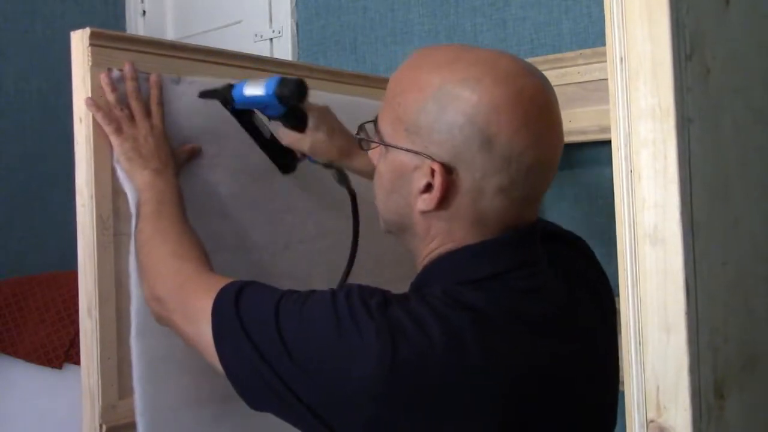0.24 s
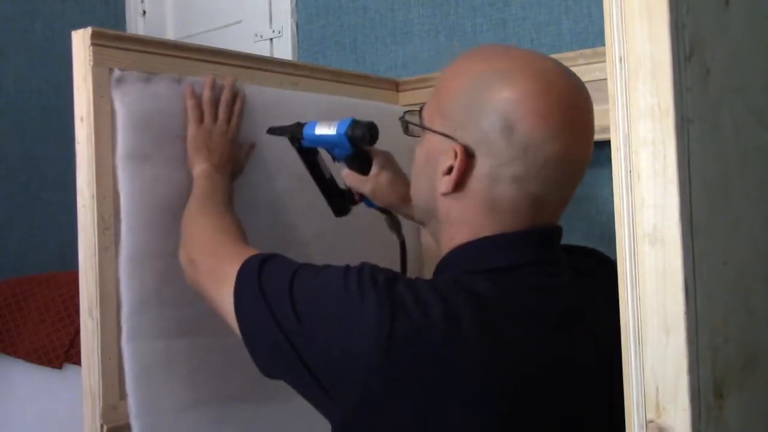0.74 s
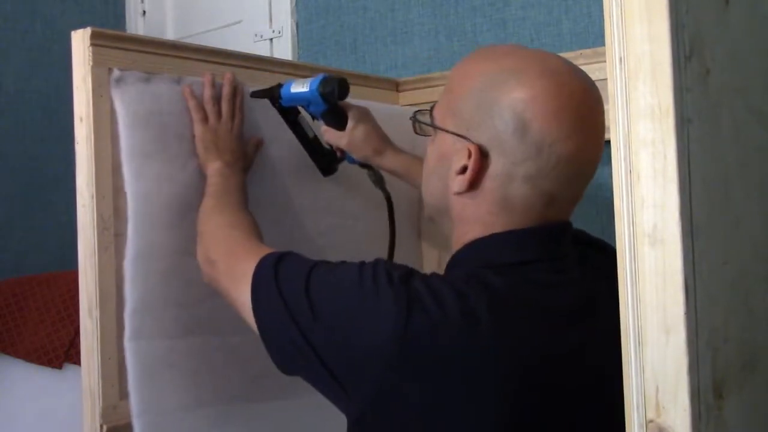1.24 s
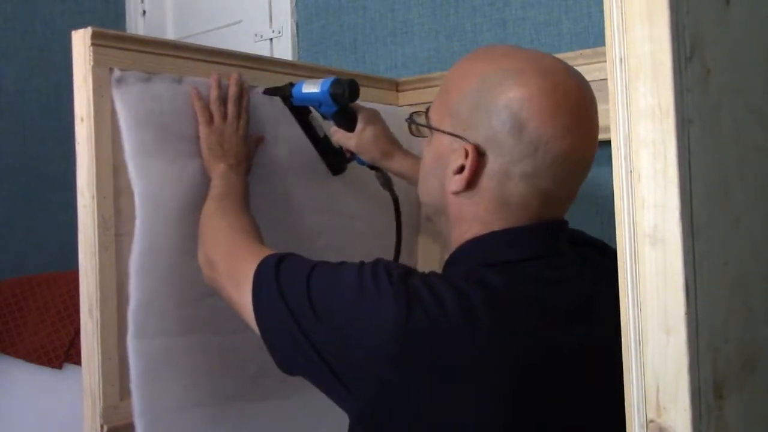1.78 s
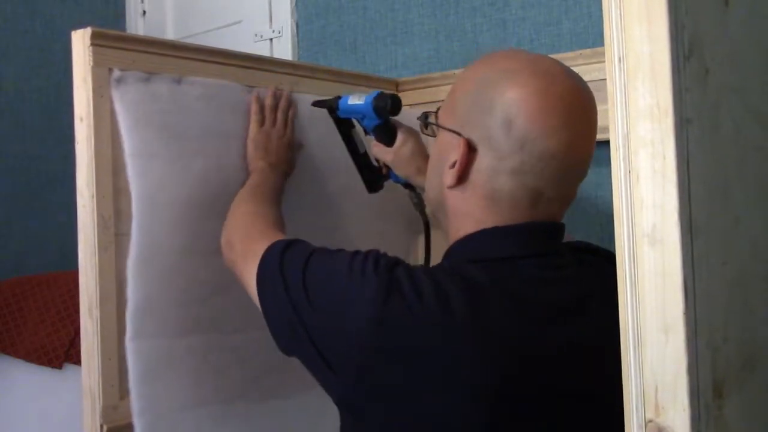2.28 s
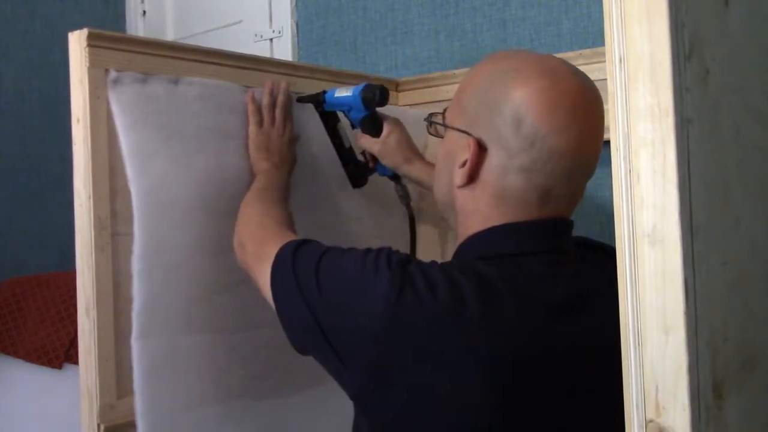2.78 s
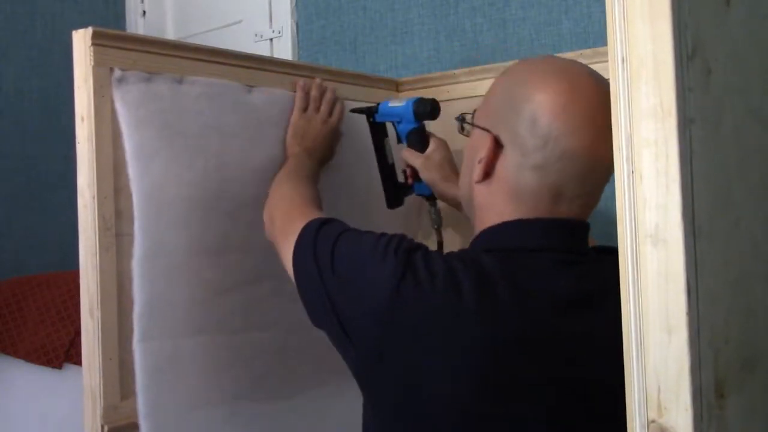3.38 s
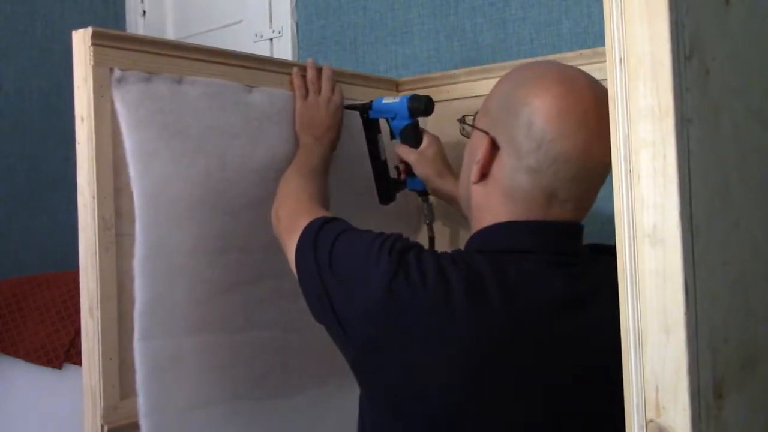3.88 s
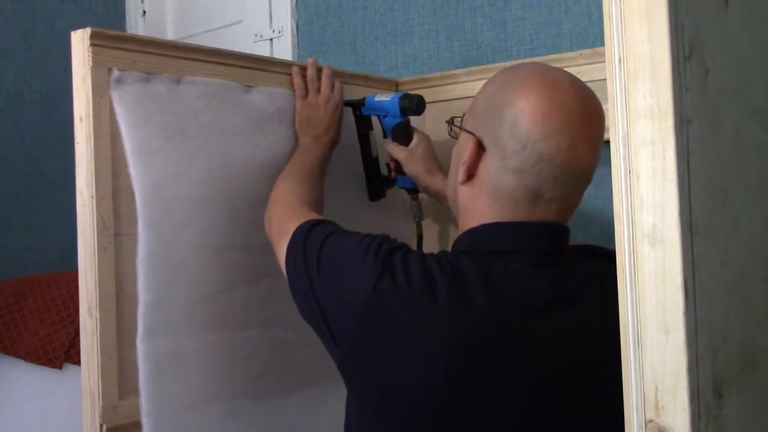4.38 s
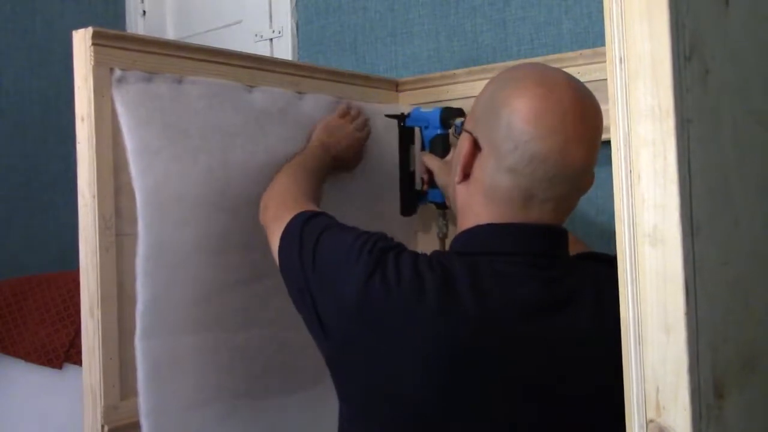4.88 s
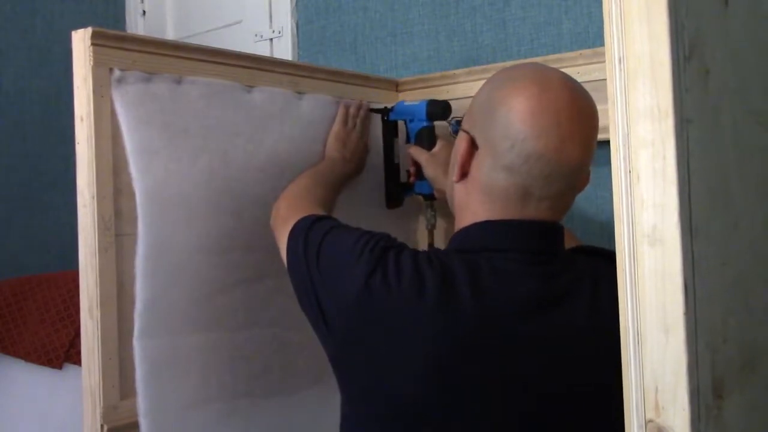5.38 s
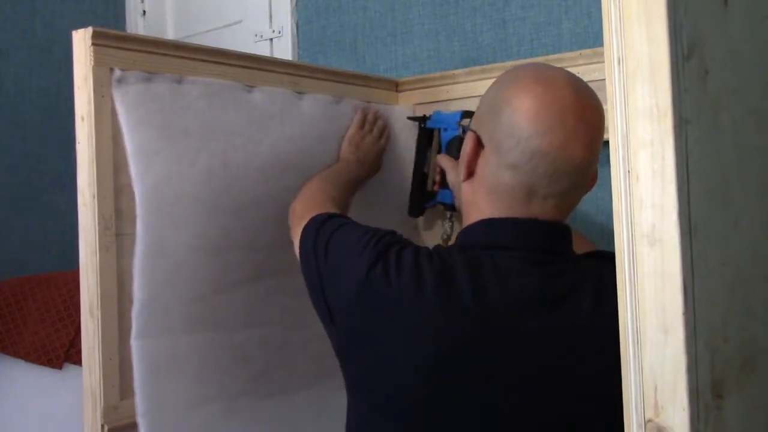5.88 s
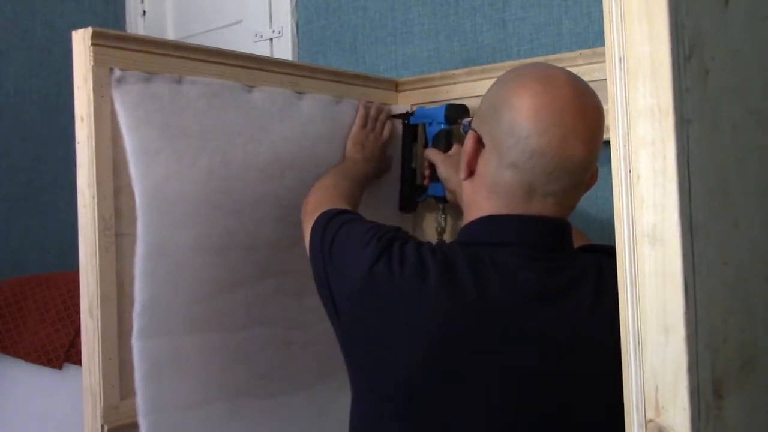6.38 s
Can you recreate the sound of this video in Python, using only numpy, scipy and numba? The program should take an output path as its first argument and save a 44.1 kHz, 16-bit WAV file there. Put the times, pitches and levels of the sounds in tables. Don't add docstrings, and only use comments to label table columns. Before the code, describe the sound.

In a small room, close to the microphone, an air stapler fires five loud shots into padding on wood. Each is a hard woody crack, followed a tenth of a second later by a spitting puff of air and a metallic clack. Between them come a palm rub, light wooden knocks, and a thin hose hiss over low room hum.

```python
import sys
import numpy as np
from scipy import signal
from scipy.io import wavfile
from scipy.ndimage import uniform_filter1d, map_coordinates
from numba import njit

SR = 44100
rng = np.random.default_rng(int(sys.argv[2]) if len(sys.argv) > 2 else 0)


def voltage_ratio(decibels):
    exponent = np.asarray(decibels, float) / 20
    return 10 ** exponent


def put_to_file(sound):
    columns = np.atleast_2d(sound).T
    safe = np.clip(columns, -1, 1)
    whole_steps = np.round(safe * 32767)
    wavfile.write(sys.argv[1], SR, whole_steps.astype(np.int16))


N = 293265
LEAD_IN = 4096
LATCH_S = .0325

# f/Hz, level/dB
HUM_TONE = [(15, -40), (25, -27), (43, -15.5), (76, -25.5), (113, -4), (178, -0.5), (204, -2), (261, -6),
            (328, 0), (367, -7), (401, -3), (429, -11), (492, -8), (1490, -17.5), (5500, -26), (7150, -56),
            (12100, -120)]
# f/Hz, side under mid/dB
HUM_WIDTH = [(60, -13.5), (110, -15), (200, -19), (380, -11.5), (700, -11), (1290, -10.5), (2380, -8.5),
             (4400, -16), (8120, -14.5), (15000, -28)]
# f/Hz, t60/s
ROOM_DECAY = [(120, 0.34), (330, 0.37), (870, 0.33), (2300, 0.25), (6000, 0.24), (10000, .2), (15000, 0.23)]
# f/Hz, side under mid/dB
ROOM_WIDTH = [(60, -30), (110, -29), (200, -41.5), (380, -35.5), (700, -32.5), (1290, -28), (2380, -26.5),
              (4400, -22.5), (8120, -15.5), (15000, -19)]
# f/Hz, level/dB
LEAK_TONE = [(2350, -27.5), (4000, -12.5), (5300, -11.5), (5880, -3.5), (6480, -0.5), (7970, 0.5),
             (10600, -3), (12500, -10.5), (15100, -9.5), (15800, -28.5)]
# start t/s, end t/s, bounce path at start/ms, at end/ms, leak level/dB
APPROACHES = [
    (1.1, 1.5, .81, .72, -63.5),
    (1.9, 2.7, .655, 0.55, -64.5),
    (3.1, 4.4, .93, .71, -62.5),
    (4.8, 5.5, .855, .69, -64),
    (5.9, 6.65, .75, .59, -64),
]
# start t/s, length/s, level/dB, trailing level/dB
STROKES = [
    (0.278, .5, -49, -62.5),
    (5.98, 0.25, -59, -70),
]
# f/Hz, level/dB
RUB_TONE = [(880, -39), (1500, -21), (1960, -5), (2140, -4), (2530, -1.5), (4050, -8), (5240, -2),
            (9830, 1), (13100, -12), (14900, -13.5), (15800, -16)]
# t/s, knock level/dB, scuff level/dB, panel thud level/dB
TOUCHES = [(0.352, -26, -90, -61), (0.644, -13, -43.5, -62), (0.699, -48, -62.5, -62),
           (1.468, -37, -43.5, -51), (1.497, -29.5, -52.5, -67), (2.294, -49, -54.5, -51),
           (2.37, -41, -55.5, -45), (2.515, -54, -53.5, -50), (2.56, -55, -58.5, -50),
           (2.617, -58.5, -54, -55), (2.726, -21.5, -38.5, -27.5), (2.744, -32, -37.5, -31),
           (3.157, -21, -41.5, -42), (3.254, -25, -41.5, -46), (3.299, -36.5, -55, -60),
           (3.452, -52, -55.5, -47), (3.513, -50, -54, -50), (3.748, -54, -56, -54),
           (3.937, -54, -60, -50.5), (4.118, -48, -59, -53.5), (4.267, -57, -63, -56.5),
           (4.324, -44, -54, -40), (4.369, -44, -54.5, -48), (5.437, -22, -43, -51),
           (5.46, -25.5, -54, -48), (6.611, -39.5, -46, -45)]
# f/Hz, level/dB
WOOD = [(250, -10.5), (330, -3), (425, -1), (560, -3), (720, -4), (900, -8), (1150, -16)]
# f/Hz, level/dB
SCUFF_TONE = [(60, -24), (110, -1.5), (400, 4), (1200, 1), (2500, -6), (3600, -15.5), (6000, -24),
              (16000, -44.5)]
# piston blow t/s, trigger let go after/s, piston return after/s
SHOTS = [
    (-.018, .102, .1165),
    (1.5793, .102, .1165),
    (2.783, .093, .1095),
    (4.427, .101, .1163),
    (5.5175, .090, .109),
]
# blow level/dB, exhaust level/dB, batten tuning [factor]
FORCE = [(30.7, -2, 1.3), (30.5, -1.5, 1.04), (28.9, -2, 0.93), (31, -1.5, .95), (29.9, -2.5, .99)]
# f/Hz, level/dB
JET_TONE = [(50, -15), (200, 0), (880, 1), (1500, -3), (2730, -1.5), (3400, -2.5), (4650, -2.5),
            (5030, -6.5), (5500, 0), (7100, 1), (9360, -3), (15800, -21)]
# f/Hz, level/dB, t60/s
THUMP = [(375, 0, .014), (700, -12, .012), (2000, -3, .014)]
# f/Hz, level/dB, t60/s
CRACK = [(4000, 3, .006), (2300, -2, .009), (6500, -5, .004), (1100, -9, .014)]
# f/Hz, level/dB
FRAME_TONE = [(18, -72.5), (30, -39.5), (70, -33), (115, -19), (309, -9), (628, -4.5), (754, -9.5),
              (859, -8), (1120, -7.5), (1240, -7.5), (2800, -6), (4480, -16.5), (7000, -21.5), (13800, -44),
              (15800, -57.5)]
# f/Hz, level/dB, t60/s
BATTENS = [(316.4, 0, 0.23), (443, -0.5, 0.19), (598.6, -9, 0.23), (882, -7.5, 0.18), (1157, -3, 0.2),
           (1693, -4.5, 0.28), (2640, -9, .22)]
# f/Hz, level/dB, t60/s
RETURN = [(499, 5.5, 0.048), (915, -2, 0.01), (1660, -30, .25)]
# f/Hz, level/dB, t60/s
MAGAZINE = [(1154, 2.5, 0.15), (1737, -4, 0.22), (851, -4, 0.2), (601, -1.5, 0.13), (1049, 3.5, 0.2),
            (1204, -2.5, 0.23)]


def evened(x):
    return x / np.sqrt(np.mean(x ** 2) + 1e-20)


def read(points, hz):
    f, value = np.transpose(points)
    return np.interp(np.log(hz + 1), np.log(f + 1), value)


def colour(x, points):
    db = read(points, abs(np.fft.fftfreq(4096, 1 / SR)))
    log_gain = np.log(voltage_ratio(np.maximum(db, -100)))
    taps = np.fft.ifft(np.exp(np.conj(signal.hilbert(log_gain)))).real[:2048]
    return signal.oaconvolve(x, taps)[:len(x)]


def noise(length, points):
    return evened(colour(rng.standard_normal(length), points))


def add(mix, s, sound):
    part = mix[..., round(s * SR):][..., :sound.shape[-1]]
    part += sound[..., :part.shape[-1]]


def ring(modes, detune=1., rise_s=.0002):
    t = np.arange(SR // 4) / SR
    sines = sum(voltage_ratio(db - 60 * t / t60) * np.sin(2 * np.pi * hz * detune * t) for hz, db, t60 in modes)
    return sines * (1 - np.exp(-t / rise_s))


def room(x):
    taps = rng.standard_normal((2, SR // 2))
    hz, t, z = signal.stft(taps, SR, nperseg=256)
    z = z * voltage_ratio(-60 * t / read(ROOM_DECAY, hz)[:, None])
    z[1] *= voltage_ratio(read(ROOM_WIDTH, hz) + 4)[:, None]
    clumps = uniform_filter1d(rng.standard_normal(z.shape), size=3, axis=2)
    clumps = evened(uniform_filter1d(clumps, size=5, axis=1))
    z *= voltage_ratio(2.7 * clumps)
    tail = signal.istft(z, SR, nperseg=256)[1]
    tail = tail * np.clip(np.arange(tail.shape[1]) / SR / .004 - 1, 0, 1)
    mid, side = signal.fftconvolve(x[None], tail / np.linalg.norm(tail[0]), axes=1)
    return np.array([mid + side, mid - side])


def hum():
    frames, hz = N // 256 + 5, np.fft.rfftfreq(1024, 1 / SR)
    a, b, c, d, patches = rng.standard_normal((frames, 513, 5)).T
    patches = uniform_filter1d(patches, size=10, axis=0)
    patches = evened(uniform_filter1d(patches, size=8, axis=1))
    z = np.array([a + 1j * b, (c + 1j * d) * voltage_ratio(read(HUM_WIDTH, hz))[:, None]])
    z = z * voltage_ratio(read(HUM_TONE, hz)[:, None] + 1.5 * patches)
    mid, side = signal.istft(z, nperseg=1024, noverlap=768)[1][:, :N]
    return voltage_ratio(-52.5) * evened(np.array([mid + side, mid - side]))


def leak():
    bounce_far, bounce_near, facing_s = .3, .58, .4
    t = np.arange(N) / SR
    start, end, far_ms, near_ms, db = np.transpose(APPROACHES)
    moments = np.ravel([start, end], "F")
    path_ms = np.interp(t, moments, np.ravel([far_ms, near_ms], "F"))
    level_db = np.interp(t, moments, np.repeat(db, 2)) - 0.5
    facing = sum(np.clip(np.minimum(t - a, b + facing_s / 2 - t) / facing_s, 0, 1)
                 for a, b in zip(start, end))
    hiss = noise(N, LEAK_TONE)
    thrown = signal.filtfilt(*signal.butter(1, [6000, 11500], "band", fs=SR), hiss)
    bounce = map_coordinates(thrown, [np.arange(N) - path_ms * SR / 1000], order=3)
    strength = bounce_far + (bounce_near - bounce_far) * facing
    return voltage_ratio(level_db) * (hiss + .75 * strength * bounce)


def stroke(t, start, length, db, trail_db):
    rise_s, sag_db, stop_s, trail_s = 0.056, -7, .035, .15
    u = t - start
    slide = np.clip(np.minimum(u / rise_s + 1, (length - u) / stop_s + 1), 0, 1)
    slide = slide * voltage_ratio(db + sag_db * np.clip(u / length, 0, 1) ** 2)
    return slide + voltage_ratio(trail_db) * (u > length) * (u < length + trail_s)


def hand():
    t = np.arange(N) / SR
    level = uniform_filter1d(sum(stroke(t, *row) for row in STROKES), size=400)
    snags = voltage_ratio(1.5 * evened(uniform_filter1d(rng.standard_normal(N), size=900)))
    return snags * level * noise(N, RUB_TONE)


def touch(knock_db, scuff_db, thud_db, rise_s=.0015, t60=.095):
    t = np.arange(SR // 4) / SR
    grain = np.arange(600)
    contact = rng.standard_normal(600) * np.exp(-grain / 110.0) / 9 + (grain == 0)
    contact = contact / np.linalg.norm(contact) * 1.2
    spot = rng.uniform(-0.81, 1, (len(WOOD), 2))
    modes = [(hz * (1 + .06 * a), db + 3 * b, t60 * 250 / hz) for (hz, db), (a, b) in zip(WOOD, spot)]
    wood = signal.oaconvolve(ring(modes, rise_s=0.0017), contact)[:len(t)]
    thud = ring([(130, thud_db, 0.14), (195, thud_db - 4, 0.18)], rise_s=max(rise_s, .004))
    scuff = noise(len(t), SCUFF_TONE) * np.minimum(t / max(rise_s, 1e-4), 1)
    scuff *= 1 + 0.96 * np.exp(-t / 0.0029)
    scuff_fall = voltage_ratio(scuff_db - 60 * np.maximum(t - rise_s, 0) / t60)
    return voltage_ratio(knock_db - 7.0) * wood + thud + scuff_fall * scuff


def rustle(rise_s):
    arch = np.hanning(round(2.4 * rise_s * SR))
    return voltage_ratio(-50) * arch * noise(len(arch), JET_TONE)


def touches():
    mix = np.zeros(N)
    for s, *levels in TOUCHES:
        add(mix, s - .002, touch(*levels))
    drag_s, drag_rise_s = 3.168, .025
    add(mix, drag_s, touch(-40, -36, -30.5, rise_s=drag_rise_s, t60=0.085))
    add(mix, drag_s, rustle(drag_rise_s))
    return mix


def vent(t):
    after = np.maximum(t - LATCH_S, 0)
    puff = np.clip(t / .002, .15, 1) * voltage_ratio(4.5 - 12 * (t / .028) ** 1.5)
    spit = voltage_ratio(6 - 60 * after / 0.044)
    bleed = voltage_ratio(-5.5 - 12 * (after / .038) ** 2)
    return np.where(t < LATCH_S, puff, np.hypot(spit, bleed))


def valve_air(t, exhaust_s, return_s, exhaust_db):
    air = noise(len(t), JET_TONE)
    thin_air = colour(air, [(2000, -17.0), (5500, -1), (16000, 11.5)])
    inlet_db = np.interp(t, [-.0115, -.0085, -.0025, .0, .006, .02], [-70, -34, -11, -14, -19, -50],
                         left=-200, right=-200)
    outlet_db = np.interp(t - exhaust_s, [0, .002, .016], [-24, -6, -10], left=-200)
    returned = air * vent(np.maximum(t - return_s, 0))
    exhaust = np.where(t < return_s, thin_air * voltage_ratio(outlet_db), returned)
    return thin_air * voltage_ratio(inlet_db) + voltage_ratio(exhaust_db) * exhaust


def shot(exhaust_s, return_s, blow_db, exhaust_db, tuning):
    t = np.arange(SR // 3) / SR - .02
    direct = valve_air(t, exhaust_s, return_s, exhaust_db)
    body, driver = rng.uniform(0.96, 1.05, 2)
    add(direct, .0211, voltage_ratio(11.5) * ring(THUMP[:1], body, rise_s=.002))
    add(direct, .02, -voltage_ratio(1.5) * ring(THUMP[1:], body))
    add(direct, .0262, -voltage_ratio(blow_db - 19) * ring(CRACK, driver))
    add(direct, .0265, voltage_ratio(blow_db - 25.0) * ring(BATTENS, tuning, rise_s=0.0092))
    add(direct, .0318, voltage_ratio(blow_db - 15.5) * ring(CRACK[1:2], .9, rise_s=0.00067))
    back_s = .02 + return_s
    add(direct, back_s, voltage_ratio(exhaust_db + 1) * ring(RETURN, rise_s=0.00059))
    add(direct, back_s + LATCH_S, voltage_ratio(exhaust_db - 13.5) * ring(MAGAZINE, body ** 0.14, rise_s=0.0012))
    blow = np.zeros(len(t))
    add(blow, .0232, voltage_ratio([blow_db + 28.0]))
    sound = room(colour(blow, FRAME_TONE) + voltage_ratio(-12) * direct)
    add(sound, 0, direct[None])
    return sound


def stapler():
    mix = np.zeros((2, N + LEAD_IN))
    for (s, *delays), force in zip(SHOTS, FORCE):
        add(mix, s - .02 + LEAD_IN / SR, shot(*delays, *force))
    return mix[:, LEAD_IN:]


def scene():
    hiss = leak() + hand()
    knocks = touches()
    hiss_room = voltage_ratio(-5) * room(hiss)[:, :N]
    knock_room = voltage_ratio(-5.5) * room(knocks)[:, :N]
    return hum() + hiss + hiss_room + knocks + knock_room + stapler()


@njit
def follow(size, rise, fall):
    out, level = np.empty_like(size), size[:200].max()
    for i in range(len(size)):
        level += (rise if size[i] > level else fall) * (size[i] - level)
        out[i] = level
    return out


def roll_off(x):
    return signal.sosfilt(signal.butter(12, 15920, fs=SR, output="sos"), x)


def record(dry):
    attack_s, release_s, limit_db = .003, .012, -9
    level = follow(abs(dry).max(0), 1 / (attack_s * SR), 1 / (release_s * SR))
    held = dry / np.maximum(level / voltage_ratio(limit_db), 1)
    bent = .93 * held / (1 + abs(held) ** 4) ** .25
    cut = signal.lfilter(*signal.butter(2, 92, "high", fs=SR), bent)
    treble_stop = signal.firwin(255, 15800, window=("kaiser", 8), fs=SR)
    cut = signal.oaconvolve(cut, treble_stop[None], "same")
    return roll_off(cut)


dry = scene()
out = record(dry)
put_to_file(out)
```